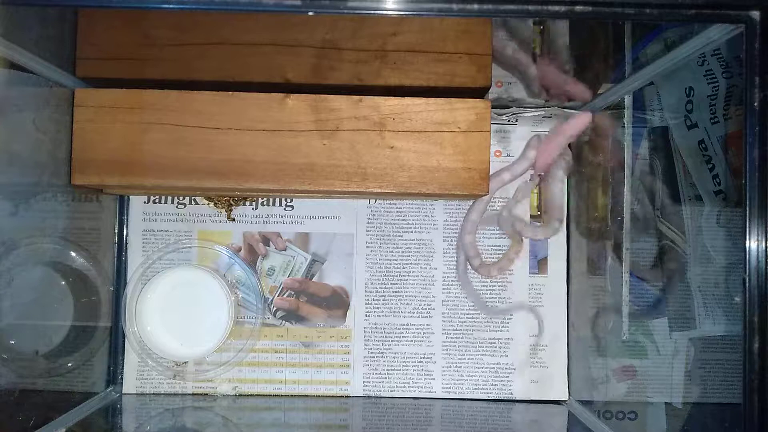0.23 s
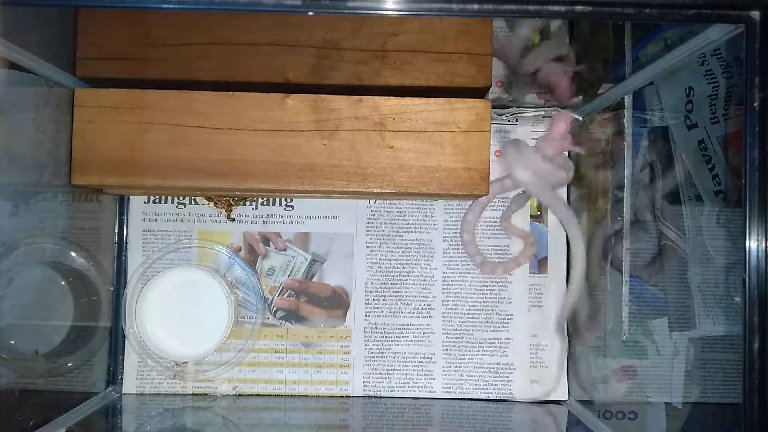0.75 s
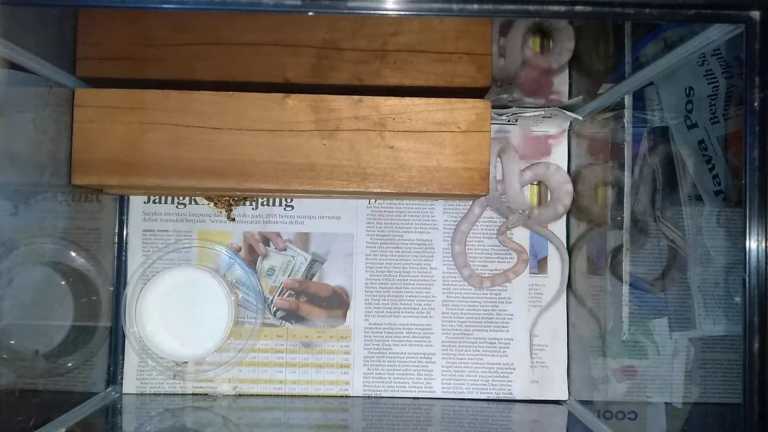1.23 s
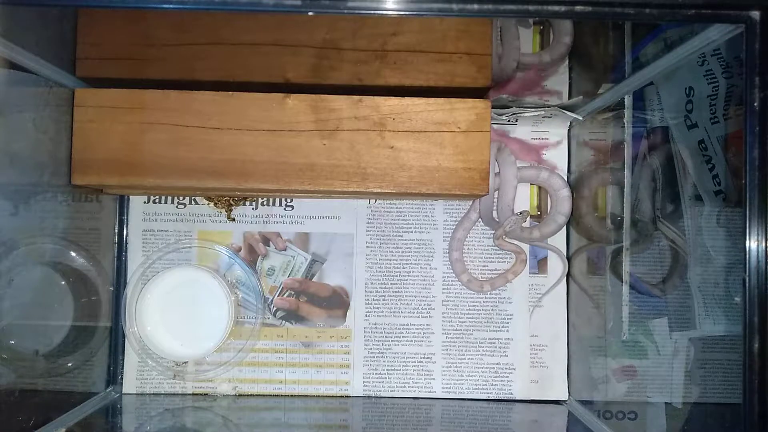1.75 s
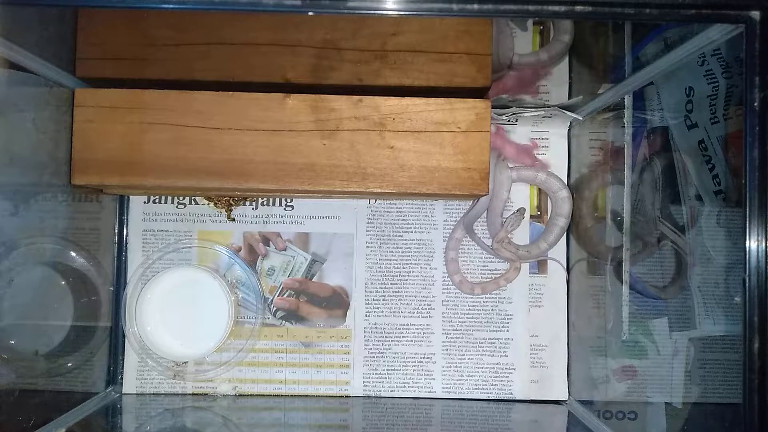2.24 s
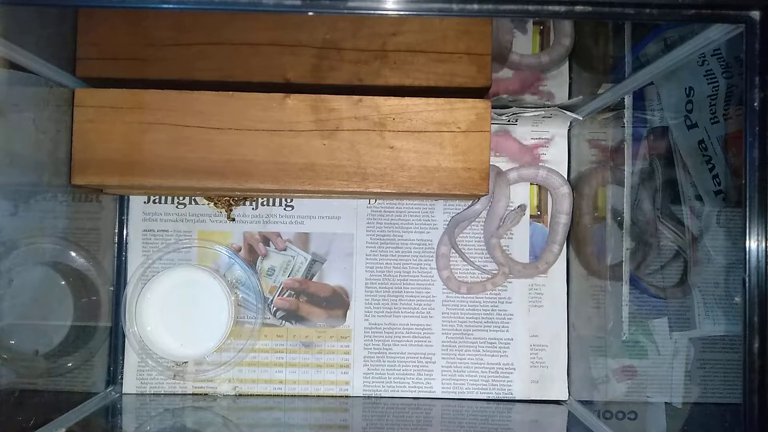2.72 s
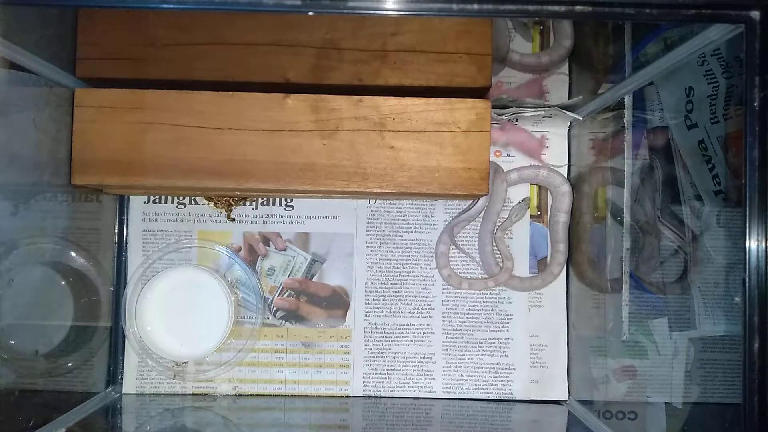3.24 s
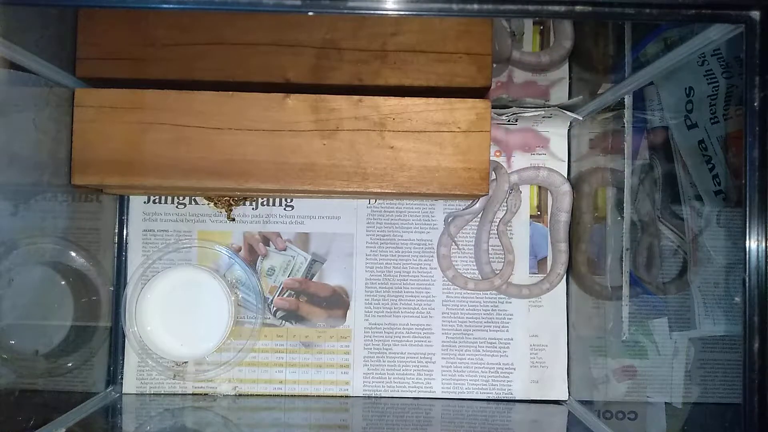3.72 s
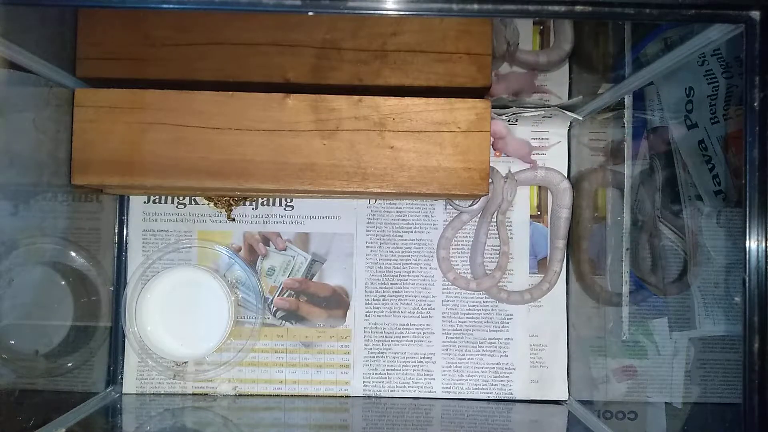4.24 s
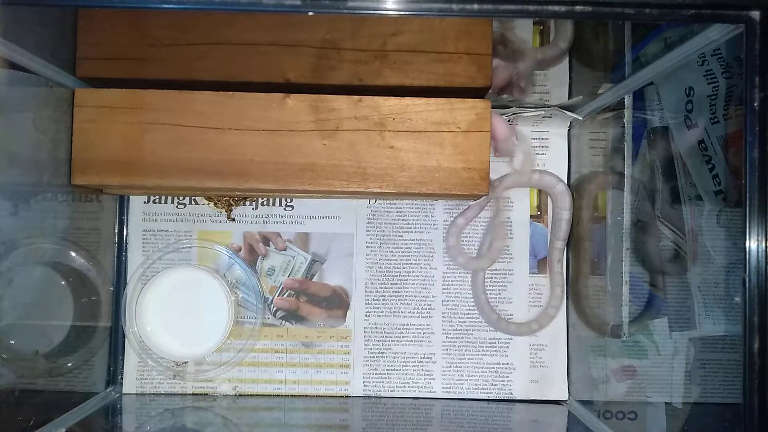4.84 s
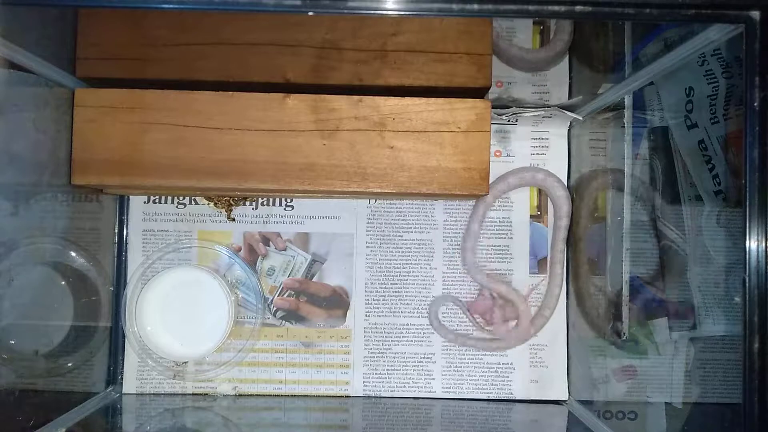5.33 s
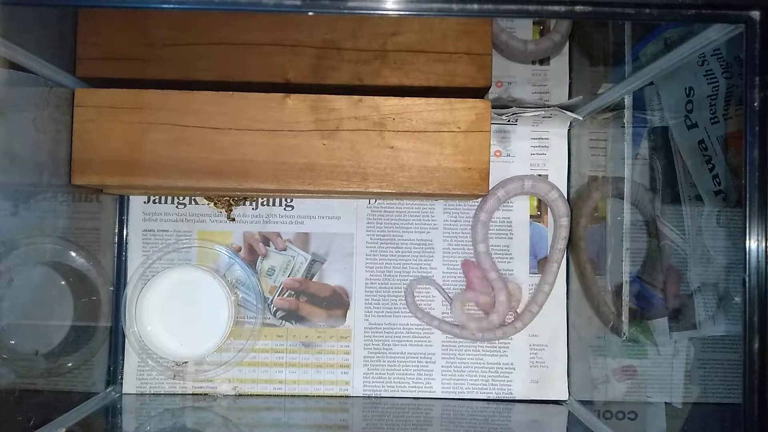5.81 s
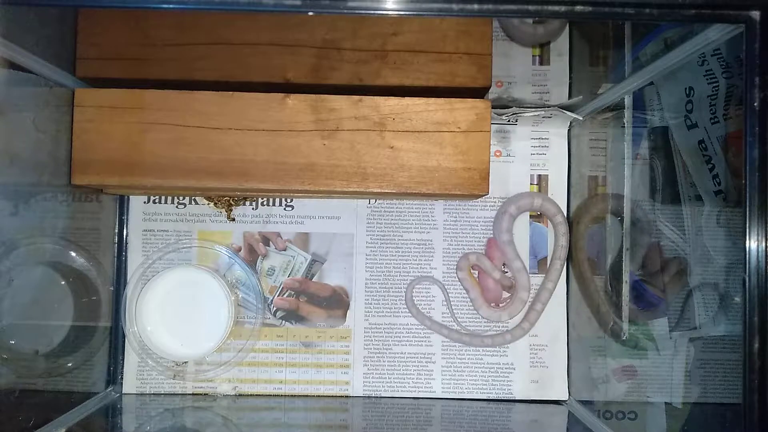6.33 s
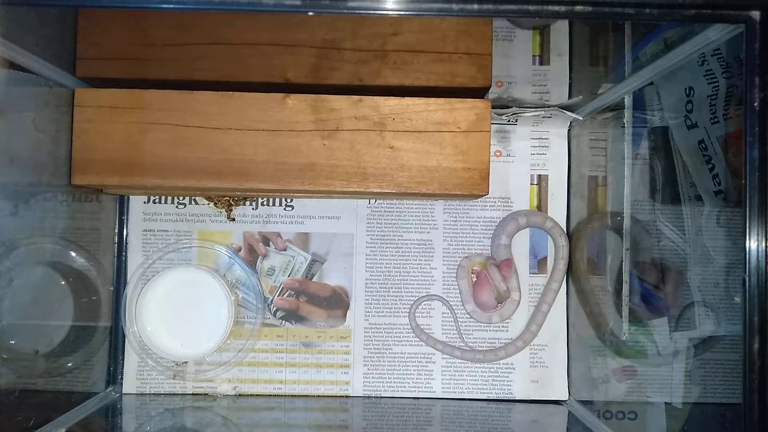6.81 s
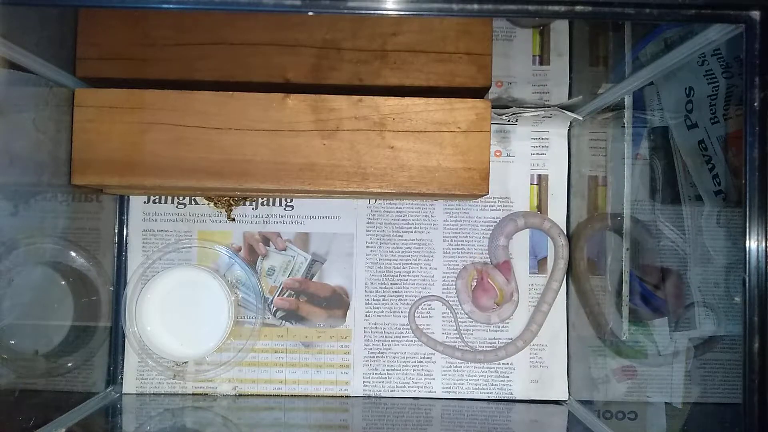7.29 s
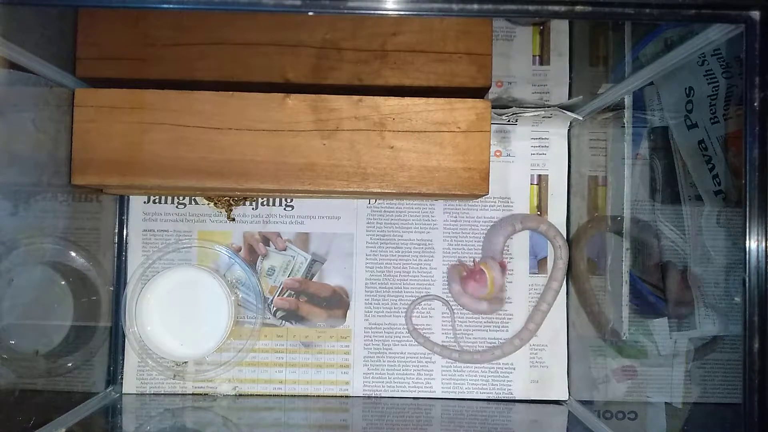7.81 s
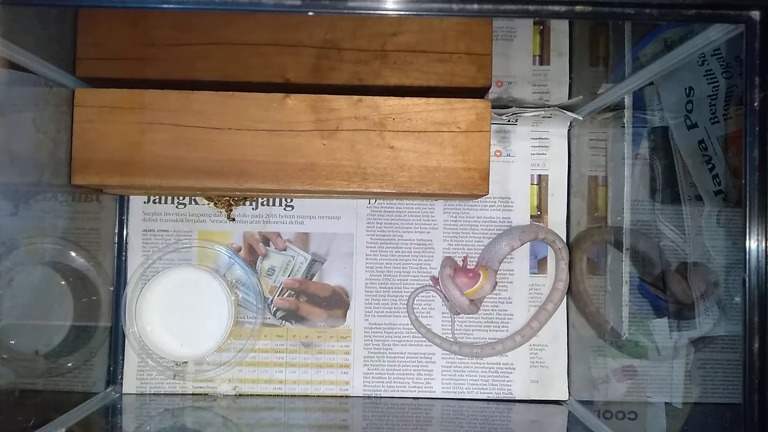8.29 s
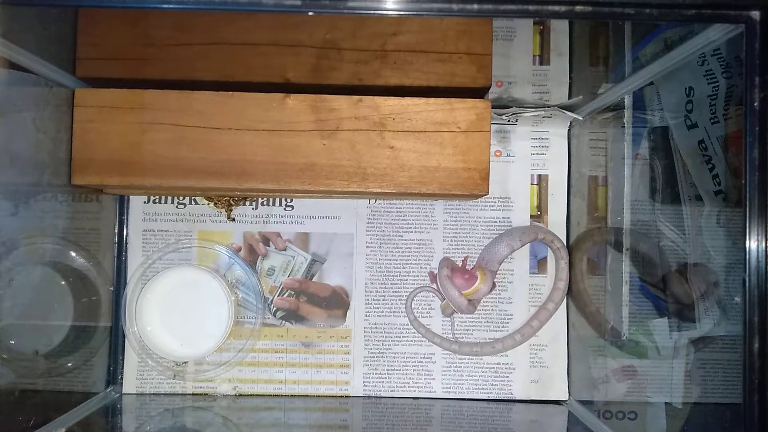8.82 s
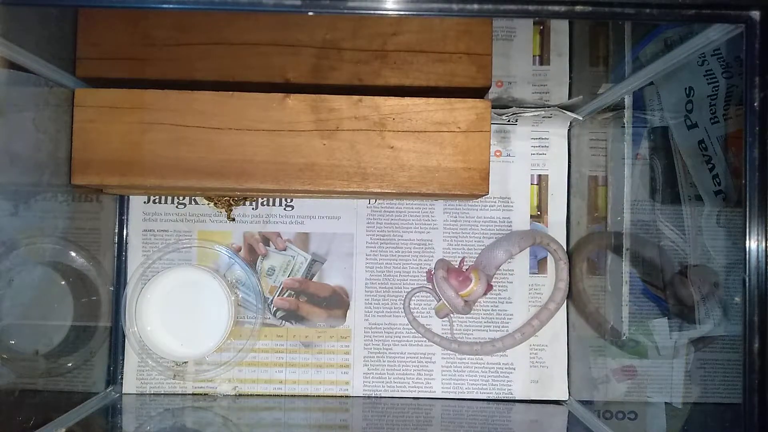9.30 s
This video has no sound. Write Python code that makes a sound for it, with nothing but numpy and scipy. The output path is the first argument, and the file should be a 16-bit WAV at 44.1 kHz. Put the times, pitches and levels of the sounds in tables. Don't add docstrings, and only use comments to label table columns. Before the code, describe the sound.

A close stereo pickup in a small glass tank lined with paper, with soft hiss and an uneven low rumble underneath. From 0.1 to 0.6 s paper rustles crisply, with a small tick at 0.4. At about 0.75 s comes a double dull thump, the second heaviest, then a gritty tong scrape on glass from 0.86 to 1.2 s with faint steel ringing. Sparse rustles, slides and tiny ticks follow between 1.6 and 4.7 s. Around 4.85 to 5.1 s the paper creases sharply and a body lands with low thuds. At 5.36 s a newborn rat's squeal climbs to a shriek at 5.65; hoarse, high cries follow at 5.84 and a long wavering one from 6.2 to 6.8. Another strong squeal runs 6.95 to 7.4, then one at 7.53, a sagging one at 8.07, and a weak, breaking last cry from 8.54 to 8.85. A light crisp paper rustle at 9.1 leaves quiet hiss and rumble.

```python
import sys
import numpy as np
from scipy import signal
from scipy.fft import rfft, irfft
from scipy.io import wavfile
from scipy.ndimage import uniform_filter1d

SR = 44100
rng = np.random.default_rng(int(sys.argv[2]) if len(sys.argv) > 2 else 0)


def bounce(signal):
    frames = np.transpose(np.atleast_2d(signal))
    limited = np.clip(frames, -1, 1)
    pcm = np.round(limited * 32767).astype(np.int16)
    wavfile.write(sys.argv[1], SR, pcm)


def boost(x):
    u = np.asarray(x, float) / 20
    return 10 ** u


N = 421151


def rms_one(x):
    return x / np.sqrt(np.mean(x ** 2) + 1e-20)


def in_time(tables, fade_s):
    t = np.arange(N) / SR
    s, *columns = np.transpose(np.concatenate(tables))
    gate = 0
    for rows in tables:
        inside_s = np.minimum(t - rows[0][0], rows[-1][0] - t)
        gate = gate + np.clip(inside_s / fade_s, 0, 1)
    return [gate] + [np.interp(t, s, c) for c in columns]


def over_spectrum(curve):
    hz, db = np.transpose(curve)
    bins = np.arange(1, N // 2 + 2) * SR / N
    return np.interp(np.log(bins), np.log(hz), db)


def coloured(x, spectrum):
    return rms_one(irfft(rfft(x) * boost(over_spectrum(spectrum)), N))


def band(x, low_hz, high_hz):
    return signal.sosfilt(signal.butter(2, [low_hz, high_hz], "band", fs=SR, output="sos"), x)


def drift(rate_hz):
    r = np.exp(-2 * np.pi * rate_hz / SR)
    return rms_one(signal.lfilter([1], [1, -2 * r, r * r], rng.standard_normal(N + SR))[SR:])


def ring(x, hz, t60):
    r = boost(-60 / (t60 * SR))
    w = 2 * np.pi * hz / SR
    return signal.lfilter([0, np.sin(w)], [1, -2 * r * np.cos(w), r * r], x + 1e-18)


def grains(per_s, spread_db):
    sizes = boost(spread_db * np.minimum(rng.exponential(1, N), 5))
    signs = rng.choice([-1, 1], N)
    return sizes * signs * (rng.random(N) < per_s / SR)


def background():
    # f/Hz, density/dB
    hiss_colour = [(300, -40), (420, -19), (980, -18), (3420, -18), (4970, -21), (8610, -18), (12800, -19),
                   (15700, -25)]
    # t/s, level/dB
    rumble = [(0.0, -65.5), (0.66, -56), (0.77, -54), (1.06, -56), (2.28, -63), (2.39, -78.5),
              (2.46, -61.5), (3.3, -68), (3.72, -65), (4.18, -65.5), (4.28, -58), (4.9, -57.5), (5.08, -52),
              (5.6, -54.5), (8.72, -61), (8.88, -72.5), (8.96, -63), (9.55, -58)]
    # f/Hz, level/dB, t60/s
    shelf = [(67, -4, 0.17), (120.9, 7, 0.037), (161.8, -1.5, 0.037)]
    hiss_db, lumps_db = -73, 5.5
    white = rng.standard_normal((5, N))
    shared = 2.5 * band(white[0], 300.0, 800.0)
    hiss = boost(hiss_db + 3.5) * coloured(white[1:3] + shared, hiss_colour) * boost(drift(6.7))

    _, deep_db = in_time([rumble], .001)
    upper_db = deep_db - 14.0
    boom = sum(boost(db) * ring(white[3], hz, t60) for hz, db, t60 in shelf)
    boom = rms_one(band(band(boom, 41.0, 220.0), 45.0, 330.0))
    deep = boost(deep_db + lumps_db * drift(6.7) - 6.5) * boom
    murmur = rms_one(band(band(white[4], 170.0, 350.0), 181.6, 360.0))
    upper = boost(upper_db + lumps_db * drift(7.3) - 2.5) * murmur
    side = .13 * np.roll(deep + upper, SR // 20) * [[1], [-1]]
    return hiss + deep + upper + side


def contacts():
    # t/s, peak level/dB, f near the top of the noise band/Hz, length/s
    slides = [(0.405, -51, 910, 0.023), (0.662, -55, 1100, 0.03), (0.723, -46, 427, 0.035),
              (1.62, -69.5, 855, 0.17), (1.915, -80, 1420, 0.035), (3.573, -65, 1450, 0.1),
              (3.986, -65.5, 1340, 0.032), (5.026, -56.5, 725, 0.051), (5.1, -74, 1400, 0.047),
              (5.37, -59.5, 1520, 0.029), (5.471, -51.5, 540, 0.076), (5.53, -52.5, 410, 0.12),
              (5.753, -57, 490, 0.057), (5.98, -61.5, 1066, 0.04), (7.196, -56.5, 790, 0.041),
              (7.517, -56, 756, 0.11)]
    # t/s, peak level/dB, t60/s
    thumps = [
        (0.724, -25.5, 0.1),
        (0.754, -18.5, 0.2),
        (5.037, -25, 0.037),
        (5.055, -23, 0.081),
        (5.122, -40, 0.4),
        (5.336, -39.5, 0.18),
    ]
    # f/Hz, level/dB
    pane = [(122, -3), (248, 1), (404, -10)]
    # t/s, peak level/dB, f/Hz
    ticks = [
        (0.412, -31, 3450),
        (0.842, -43.5, 3800),
        (2.939, -39, 3750),
        (1.615, -40, 2970),
        (3.3366, -43, 3600),
        (4.6794, -40.5, 3750),
        (7.529, -31, 6060),
    ]
    out, t = np.zeros(N + SR), np.arange(SR // 2) / SR
    noise = rng.standard_normal((len(slides), len(t)))
    for (s, db, hz, length), white in zip(slides, noise):
        puff = t / length * np.exp(1 - t / length * 4.57) * 9.0
        out[round(s * SR):][:len(t)] += boost(db - 6.5) * puff * rms_one(band(white, hz / 3.5, hz * 1.1))
    push = t * np.exp(-t / .0008) / 22e-3
    for s, db, t60 in thumps:
        floor = sum(boost(mode_db) * ring(push, hz, t60) for hz, mode_db in pane)
        out[round(s * SR):][:len(t)] += boost(db - 0.5) * band(floor, 153.0, 680.0)
    click = 1. * (t == 0)
    for s, db, hz in ticks:
        out[round(s * SR):][:len(t)] += boost(db) * ring(click, hz, .003)
    return out[:N]


def tongs():
    # t/s, level/dB
    scrape = [(.86, -62), (.872, -37.5), (.91, -43), (.98, -56), (1.06, -77.5), (1.1, -58), (1.14, -58),
              (1.22, -74), (1.27, -92)]
    # f/Hz, density/dB
    scrape_colour = [(798, 7.5), (975, -8), (1500, 0), (3330, 12.5), (3820, 7), (8300, 3.5), (10500, -8.5),
                     (15700, -23)]
    # f/Hz, level/dB, t60/s
    arm_modes = [(791, -6, .35), (1163, -15, .26), (1459, -10, .55), (2700, -9, .2), (1803, -12, .4),
                 (3155, -8, .2)]
    arms_db = -75
    arms_follow = .3
    gate, db = in_time([scrape], 0.0014)
    slips = gate * boost(arms_follow * db) * rms_one(grains(6000.0, 3.0))
    arms = sum(boost(mode_db) * ring(slips, hz, t60) for hz, mode_db, t60 in arm_modes)
    stroke = gate * boost(db) * coloured(grains(6000.0, 3.5), scrape_colour)
    return stroke + boost(arms_db) * arms


def rustle():
    # t/s, crisp level/dB, dull level/dB, rise/s
    rustles = [(0.11, -64, -66.5, 0.048), (0.182, -54.5, -65, 0.038), (0.23, -43.5, -57.5, 0.01),
               (0.297, -60.5, -67, 0.035), (0.412, -56, -69, 0.01), (0.489, -51.5, -57.5, 0.073),
               (0.555, -62, -73, 0.0066), (0.61, -62.5, -69, 0.049), (1.669, -54.5, -61.5, 0.042),
               (1.927, -50, -56, 0.02), (1.967, -52, -55.5, 0.014), (2.301, -49.5, -59, 0.014),
               (2.424, -54, -59.5, 0.047), (2.764, -60.5, -66, 0.051), (3.029, -65, -73, 0.027),
               (3.431, -65.5, -75.5, 0.039), (3.58, -55, -54.5, 0.041), (3.687, -53.5, -56, 0.033),
               (3.761, -50.5, -58, 0.025), (4.002, -62, -60, 0.017), (4.343, -65, -71, 0.023),
               (4.421, -57, -61.5, 0.013), (4.841, -57.5, -52.5, 0.01), (4.889, -55, -84, 0.029),
               (5.092, -60, -59, 0.0098), (5.129, -58.5, -64, 0.036), (5.049, -68, -63.5, 0.028),
               (5.5, -66, -61.5, 0.087), (5.58, -60, -67, 0.079), (9.12, -47, -92, 0.014),
               (9.45, -71, -71, 0.027)]
    # t/s, crisp level/dB, dull level/dB
    creep = [(0.731, -74, -74), (1.34, -80, -81), (1.568, -74, -79.5), (2.94, -69.5, -70),
             (3.327, -70.5, -66), (3.878, -70, -67), (4.171, -76.5, -78), (4.229, -69, -80),
             (4.596, -74, -73), (4.69, -82, -75), (5.249, -71, -87), (9.246, -81, -73.5)]
    # f/Hz, density/dB
    crisp_colour = [(2940, -18), (5000, -11.5), (8420, -3), (11400, -3), (12600, -5), (15700, -12)]
    # f/Hz, density/dB
    dull_colour = [(880, -9.5), (1500, -0.5), (1900, -3), (2730, 4), (4450, 8.5), (5500, -1), (7150, -4.5),
                   (12100, -120)]
    creep_rise_s, fall_per_rise, patchy_db = 0.066, 0.79, 1.8
    crisp, dull = np.zeros(N), np.zeros(N)
    around = np.arange(-SR // 5, SR // 5)
    t = around / SR
    moves = list(rustles) + [(*row, creep_rise_s) for row in creep]
    for s, crisp_db, dull_db, rise in moves:
        swell = np.exp(-(t / np.where(t < 0, rise, fall_per_rise * rise)) ** 2)
        at = np.clip(round(s * SR) + around, 0, N - 1)
        crisp[at] += boost(crisp_db) * swell
        dull[at] += boost(dull_db) * swell
    paper = crisp * coloured(grains(1500.0, 5.0), crisp_colour)
    paper = paper + dull * coloured(grains(1000.0, 5.0), dull_colour)
    paper = boost(3.5 * drift(45.0)) * paper
    edges = [600, 2500, 5000, 7500, 10500, 13500, 18000]
    out = 0
    for k in range(6):
        out = out + (-1) ** k * boost(patchy_db * drift(9.0)) * band(paper, *edges[k:k + 2])
    return out


def creases():
    # t/s, level/dB, centre f/Hz, t60/s
    folds = [(0.224, -48, 11000, 0.086), (0.408, -55, 3500, 0.19), (1.614, -63, 2980, 0.11),
             (1.912, -61, 4000, 0.088), (2.292, -53, 9050, 0.086), (3.333, -72, 3600, 0.056),
             (3.562, -56, 3430, 0.13), (4.836, -50, 4330, 0.15), (4.876, -50, 8400, 0.2),
             (5.084, -42, 4600, 0.33), (5.108, -58, 4100, .2), (5.784, -52, 9600, 0.16),
             (7.531, -64, 4985, 0.078)]
    out, t = np.zeros(N + SR), np.arange(SR // 4) / SR
    snaps = rms_one(grains(2500.0, 4.0))
    for s, db, hz, t60 in folds:
        at = round(s * SR)
        spray = band(snaps[at:at + len(t)], hz / 1.17, hz * 1.37)
        out[at:at + len(t)] += boost(db + 0.5 - 60 * t / t60) * spray
    return out[:N]


def squeals():
    # t/s, pitch f/Hz, effort level/dB, hoarseness/0-1
    gripped = [
        [(5.36, 1500, -48.5, 0.55), (5.395, 2460, -39, 0.25), (5.422, 3156, -37, 0.19), (5.49, 3423, -34.5, 0),
         (5.54, 3180, -45.5, 0.12), (5.595, 3210, -36.5, 0.03), (5.64, 3350, -39, 0.1), (5.657, 3390, -18, 0)],
        [(5.659, 3290, -27.5, 0), (5.675, 3390, -27.5, 0.13), (5.7, 3094, -41, 0.2), (5.74, 3164, -64, 0.15),
         (5.79, 3166, -65, 0)],
        [(5.842, 2900, -47.5, 0.78), (5.875, 3303, -33.5, 0.26), (5.895, 3364, -34, 0.23),
         (5.98, 3580, -24.5, 0.06), (6.0, 3380, -32.5, 0.36), (6.03, 3327, -27, 0), (6.045, 2650, -29.5, .4),
         (6.075, 2500, -37, 0.3), (6.1, 2382, -51, 0.61)],
        [(6.213, 2460, -53.5, 0.8), (6.235, 3295, -39, 0.37), (6.255, 3640, -40.5, 0.14),
         (6.325, 3760, -32, 0.21), (6.375, 3136, -39, 0.07), (6.4, 3113, -44, 0)],
    ]
    # t/s, pitch f/Hz, effort level/dB, hoarseness/0-1
    squeezed = [
        [(6.401, 3140, -29.5, 0.18), (6.48, 3177, -39, 0.17), (6.55, 2864, -27.5, 0.14),
         (6.62, 2960, -35, 0.17), (6.67, 3168, -27, 0.16), (6.697, 3454, -27, 0.14), (6.745, 2948, -31.5, 0.15),
         (6.78, 2828, -38.5, 0.15), (6.81, 2823, -65, 0.15)],
        [(6.955, 1705, -47.5, .6), (6.98, 2598, -39.5, 0.45), (6.995, 3164, -32.5, 0.04),
         (7.025, 3208, -30, 0.09), (7.065, 3088, -50.5, 0.42), (7.078, 3130, -59, 0.65)],
        [(7.082, 3440, -28, 0.42), (7.11, 3540, -26, 0.1), (7.14, 3642, -15, 0.05), (7.18, 3590, -29.5, 0.13),
         (7.24, 3578, -37, 0.18), (7.295, 3562, -32, 0.14), (7.325, 3410, -28.5, 0.09),
         (7.355, 3153, -43, 0.33), (7.405, 3128, -45, 0.61)],
    ]
    # t/s, pitch f/Hz, effort level/dB, hoarseness/0-1
    tiring = [
        [(7.53, 2760, -50, 1.1), (7.56, 3158, -35.5, .3), (7.62, 3420, -41, .23), (7.66, 3590, -26, 0.14),
         (7.73, 3550, -42, 0.3), (7.8, 3690, -27, .15), (7.82, 3168, -34, 0.3), (7.85, 3068, -36.5, 0.19),
         (7.89, 3063, -60, 0.2)],
        [(8.07, 2286, -55.5, 0.88), (8.095, 2777, -45, 0.52), (8.12, 2967, -44.5, 0.4),
         (8.158, 2943, -35.5, 0.3), (8.18, 2690, -34.5, 0.35), (8.215, 2547, -44.5, 0.29),
         (8.24, 2335, -36, 0.2), (8.27, 2074, -39.5, 0.54), (8.31, 1904, -66, .8)],
        [(8.54, 2062, -51.5, 0.7), (8.57, 2072, -46.5, 0.38), (8.6, 2060, -39.5, 0.41),
         (8.63, 2089, -48.5, 0.51), (8.648, 2058, -48, 0.9)],
        [(8.652, 2392, -46, 0.22), (8.665, 2383, -37.5, 0.18), (8.705, 2396, -37.5, 0.2),
         (8.735, 2484, -35, 0.19), (8.757, 2540, -30.5, 0.17), (8.775, 2537, -49, 0.32),
         (8.79, 2168, -40.5, 0.88), (8.815, 1958, -49.5, 0.5), (8.845, 1807, -54, 0.7)],
    ]
    # f/Hz, level/dB
    mouth = [(2000, -19.5), (3500, -13), (5600, -14.5), (7300, -10.5), (9000, 4), (11000, -8.5),
             (13500, -17), (16000, -27.5)]
    # t/s, tilt/dB per octave
    gape = [(5.4, -1.5), (5.5, 8), (5.65, 18), (5.72, -2), (5.9, 10), (6.0, 1.5), (6.06, 0), (6.3, 0),
            (6.55, 4.5), (6.7, 5.5), (7.0, -8.5), (7.15, 1.5), (7.36, 1), (7.6, -3.5), (7.78, -10.5),
            (8.12, -9), (8.6, -2.5), (8.8, 0.5)]
    # f/Hz, density/dB
    throat = [(1500, -19.5), (2500, -10.5), (4500, -9.5), (6000, -7), (9000, 0), (11500, -55), (14000, -14),
              (16000, -51)]
    easy_db, low_follows = -40, 0.36
    waver_db = 3.5

    gate, hz, effort_db, hoarse = in_time(gripped + squeezed + tiring, 0.006)
    hoarse = np.clip(hoarse, 0, 1)
    tremble = (.006 + .04 * hoarse) * drift(45.0) + .006 * drift(200.0)
    tremble = tremble + .07 * hoarse ** 1.5 * drift(600.0)
    phase = 2 * np.pi * np.cumsum(hz * (1 + tremble)) / SR
    mouth_hz, mouth_db = np.transpose(mouth)
    _, tilt_db = in_time([gape], .001)
    tones = 0
    for k in range(1, 8):
        db = effort_db if k > 1 else easy_db + low_follows * (effort_db - easy_db)
        db = db + np.interp(np.log(k * hz), np.log(mouth_hz), mouth_db)
        if k > 1:
            db = db + tilt_db * np.log2(k / 3)
        waver = drift(7.2) + 0.41 * drift(74.0) + 0.67 * drift(160.0)
        db = db + waver_db * min(k / 2, 1) * waver
        tones = tones + boost(db) * np.sin(k * phase) * (k * hz < SR / 2.2)
    rasp = boost(3.5 + effort_db) * hoarse ** 1.855 * coloured(rng.standard_normal(N), throat)
    return gate * (np.sqrt(2) * tones + rasp)


def tank(sources):
    # f/Hz, left-right level/dB
    ears = [(400, -0.5), (1200, -8.5), (3000, 1), (6400, -2.5), (8700, -13.5), (10300, 3.5), (12500, 7),
            (15000, 14)]
    # t60/s, wall echo level/dB
    tank_t60_s, tank_walls_db = (0.2, 0.19, 0.12), (6, 7.5, 6.5)
    t, heard = np.arange(SR // 3) / SR, 0
    for x, t60, walls_db in zip(sources, tank_t60_s, tank_walls_db):
        spray = rng.standard_normal((2, len(t)))
        spray = band(band(spray, 500.0, 19000.0), 500.0, 19000.0)
        echoes = spray * boost(-60 * t / t60) * (t > .001)
        echoes *= boost(walls_db) / np.sqrt(np.sum(echoes ** 2, axis=1, keepdims=True))
        echoes[[0, 1], [0, 11]] = 1
        wet = signal.oaconvolve(x[None], echoes, axes=1)[:, :N]
        heard = heard + wet / np.sqrt(1 + boost(walls_db) ** 2)
    return irfft(rfft(heard) * boost(over_spectrum(ears) * [[.5], [-.5]]), N)


def scene():
    moves = boost(1.0) * rustle() + creases() + boost(8.5) * tongs()
    return tank([boost(-2.5) * squeals(), moves, contacts()]) + background()


def thinned(x, masked_db, faint_db, busy_db, bass_db):
    window = np.sin(np.pi * (np.arange(2048) + .5) / 2048)
    hz, _, frames = signal.stft(x, SR, window, 2048, 1024)
    hz = hz[:1024, None]
    power = np.mean(np.abs(frames[:, :1024]) ** 2, axis=0)
    wide = np.repeat(power.reshape(64, 16, -1).mean(axis=1), 16, axis=0)
    near = uniform_filter1d(wide * (hz > 700), size=320, axis=0)
    sliver = uniform_filter1d(uniform_filter1d(power, size=7, axis=0), size=3, axis=1)
    around = uniform_filter1d(uniform_filter1d(power, size=64, axis=0), size=3, axis=1)
    busy = around > 5 * np.percentile(around, 20, axis=1, keepdims=True)
    unmasked = wide > near * boost(masked_db) ** 2
    strong = sliver > around * boost(np.where(busy, busy_db, faint_db)) ** 2
    keep = (unmasked & strong) | (hz < 1900)
    faint_bass = (power < boost(bass_db) ** 2) & (hz < 345)
    frames[:, :1024] *= keep * np.where(faint_bass, .3, 1) * (hz > 30) * (hz < 15800)
    return signal.istft(frames, SR, window, 2048, 1024)[1][:, :N]


def band_limit(x):
    return signal.sosfilt(signal.butter(12, 15840, fs=SR, output="sos"), x)


def record(dry):
    mix = thinned(dry, masked_db=-18.5, faint_db=-1.5, busy_db=-6.5, bass_db=-83)
    return band_limit(mix)


dry = scene()
out = record(dry)
bounce(out)
```